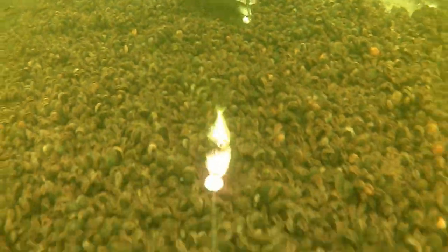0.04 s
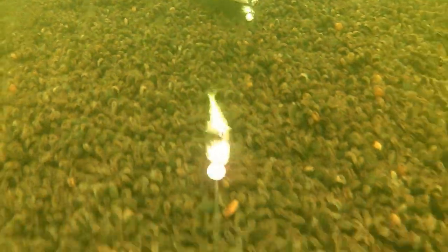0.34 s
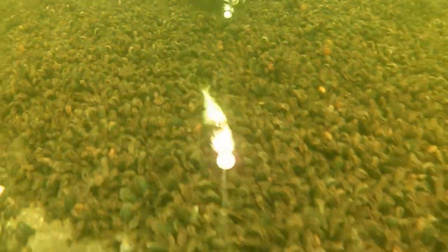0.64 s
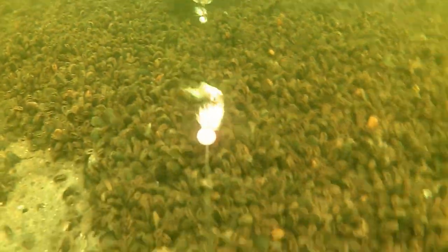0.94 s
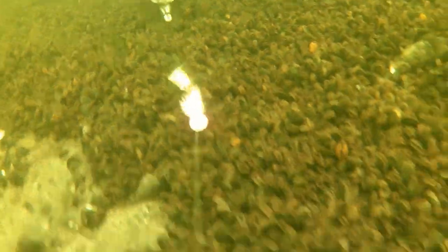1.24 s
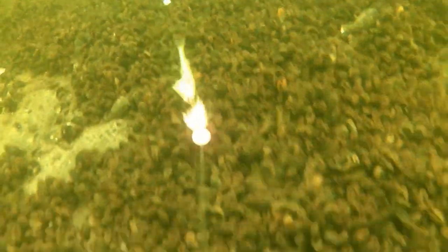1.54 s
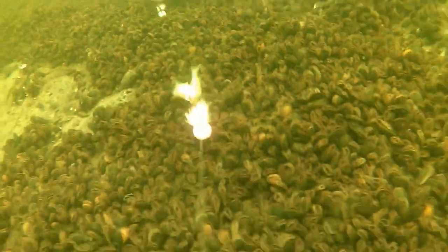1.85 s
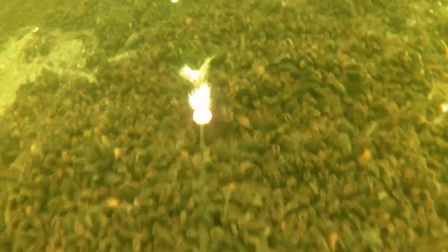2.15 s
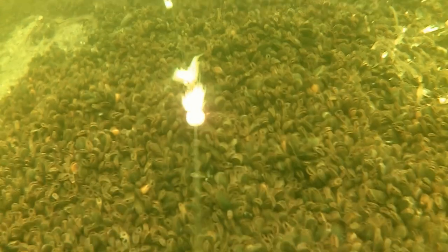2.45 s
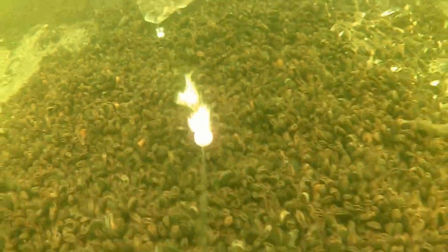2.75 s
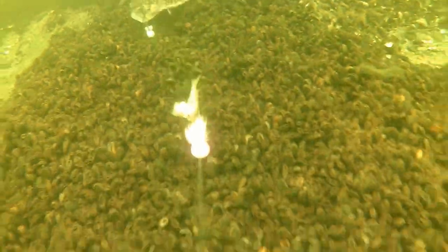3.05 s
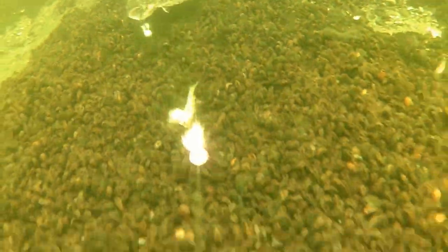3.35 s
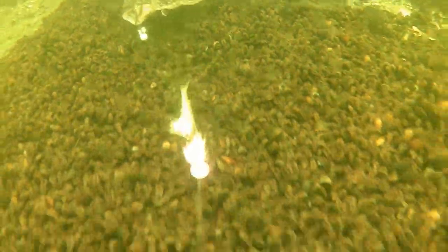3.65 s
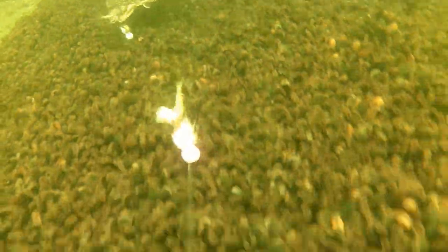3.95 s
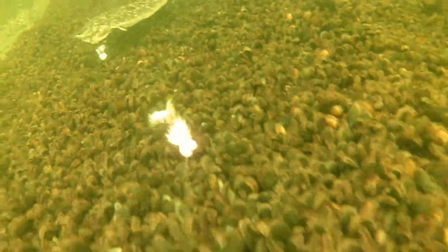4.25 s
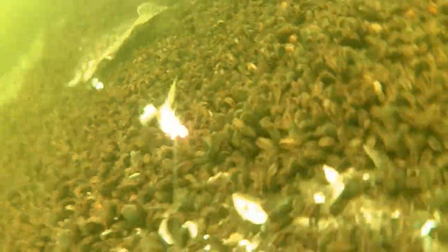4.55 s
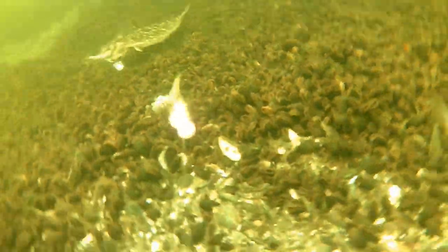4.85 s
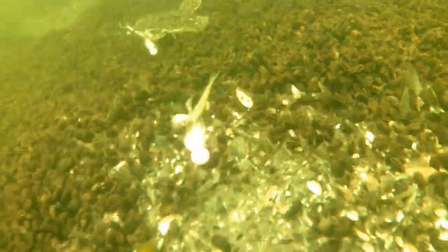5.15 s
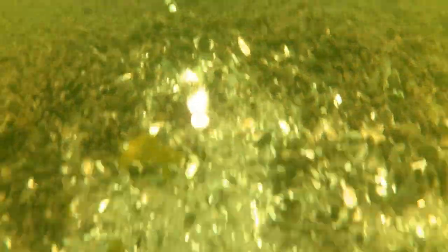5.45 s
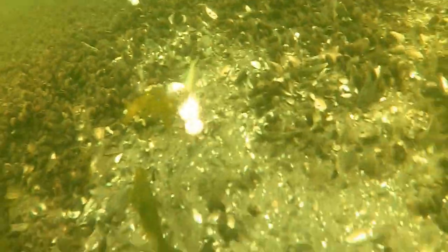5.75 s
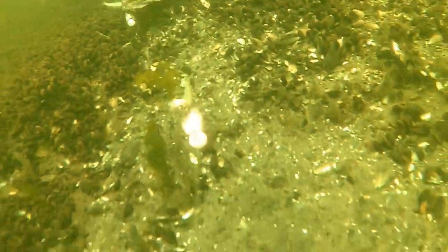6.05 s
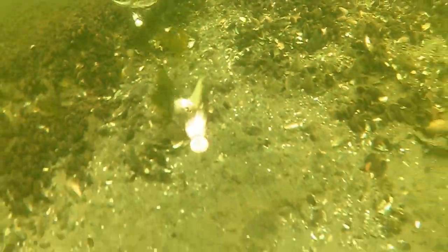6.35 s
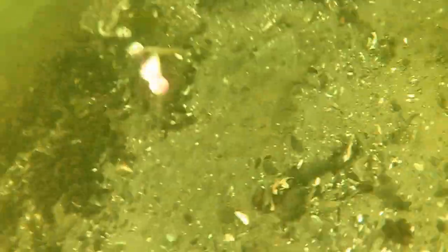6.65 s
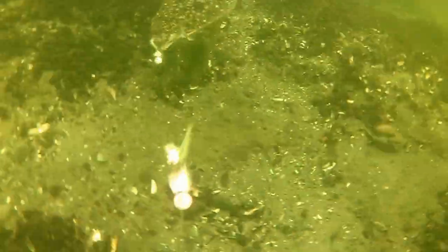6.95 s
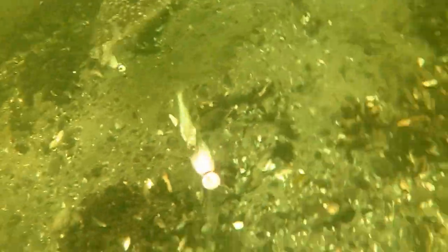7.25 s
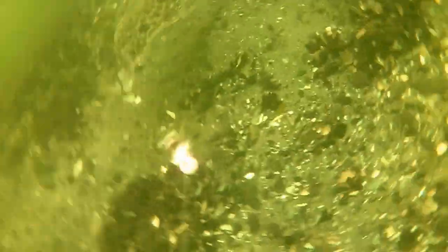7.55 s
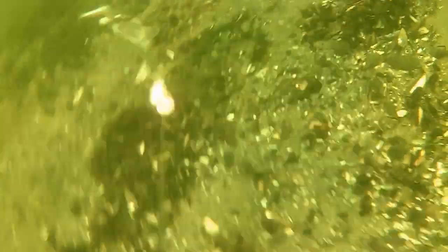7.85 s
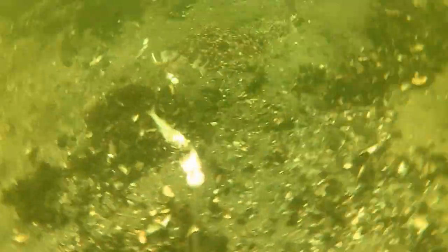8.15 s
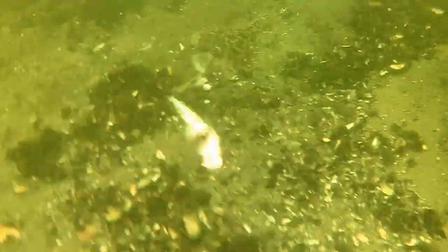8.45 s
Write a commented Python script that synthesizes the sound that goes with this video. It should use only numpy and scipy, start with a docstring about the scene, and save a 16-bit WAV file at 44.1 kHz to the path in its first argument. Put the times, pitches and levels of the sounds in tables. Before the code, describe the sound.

Lead jigs are towed over a shell bed, heard from inside a sealed underwater camera housing. The line rattles faintly at first, then rubs and hums very quietly beneath a soft, even water hiss. A sharp double click and a few scattered light taps come through. In the last couple of seconds the knocks grow louder and crowd together, short and hard, with brief scrapes and dull bumps from the rig.

```python
"""On an underwater shell bed, a camera in a sealed housing is towed with lead jigs trailing on its lines.
Lead knocks and drags on shells, and each contact excites the same short-lived modes of the housing;
once the rig runs on the bed, hard knocks bring a clatter and bumps set its frame ringing low.
Between knocks the tow line rubs by stick-slip friction, rattles on its fitting and hums as it sheds
eddies in the current, over a faint steady hiss."""
import sys
import numpy as np
from scipy import signal
from scipy.fft import rfft, irfft
from scipy.io import wavfile
from scipy.ndimage import uniform_filter1d

SR = 44100
rng = np.random.default_rng(int(sys.argv[2]) if len(sys.argv) > 2 else 0)


def transcribe(signal):
    """Save signal, clipped to [-1, 1], as a 16-bit WAV file at the path in sys.argv[1]."""
    frames = np.atleast_2d(signal).T
    limited = np.clip(frames, -1, 1)
    pcm = np.round(limited * 32767).astype(np.int16)
    wavfile.write(sys.argv[1], SR, pcm)


N = 383229
T = np.arange(N) / SR

# Impacts of lead on shell. Each row: start in seconds, relative level in dB,
# hollowness (lift of the low modes) in dB, brightness (lift of the high modes) in dB.
KNOCKS = [(1.0744, -47, 4, -18), (1.8516, -53, 8, -8.5), (2.014, -26, -8.5, -1), (2.0195, -32.5, 4, 0.5),
          (2.042, -47.5, 11, -6), (2.0635, -30.5, -4, -4), (2.07, -44, 11.5, -12), (2.2838, -47, 6.5, -5.5),
          (2.558, -51, 11.5, -16), (4.3564, -34.5, -1, -8.5), (4.4811, -42, 2, -4.5),
          (4.5154, -39.5, 2.5, -14), (4.732, -49, 3, -2), (5.6075, -45, 6.5, -7), (6.4275, -49.5, 6, -8.5),
          (6.4593, -55, 5, 14), (6.4813, -26.5, 7.5, 5), (6.4939, -32, 1, 2), (6.508, -25, 5, 3.5),
          (6.576, -49, 18, 5), (6.5882, -40, 5, 2), (6.6022, -16.5, -4.5, 2), (6.6216, -41, 7, 1.5),
          (6.8659, -45.5, 7.5, -8), (6.913, -48.5, 6, -26), (7.112, -45, 7, -18), (7.153, -45, 11, 1),
          (7.2023, -44, 4, -1), (7.2164, -25.5, 0, -2.5), (7.234, -40.5, 5, -14.5), (7.3613, -46.5, 9, -6),
          (7.403, -40.5, 4, -0.5), (7.4076, -25, -5.5, -4), (7.4152, -32, 9, 3), (7.428, -35, 5.5, -11),
          (7.4773, -33.5, 2, -1.5), (7.5063, -25.5, 0.5, 2), (7.513, -36, 1, 0), (7.6743, -46, 3.5, -8.5),
          (7.7872, -24, -2.5, -1), (7.8474, -48.5, 13, -4), (7.927, -30, 3, 3), (7.9475, -37, 7.5, -2),
          (8.073, -43, 7.5, -6.5), (8.104, -24, 0, -2.5), (8.1147, -34, 2, -6), (8.1195, -38, 5.5, 0.5),
          (8.3019, -44.5, 5.5, -0.5), (8.333, -18.5, -1, -1.5), (8.337, -33, 9.5, 7.5),
          (8.3456, -35.5, 1.5, -4), (8.3899, -40, 8, 4.5), (8.444, -28, 4.5, 4), (8.453, -35, 8.5, 3.5),
          (8.4729, -17.5, -4, -2), (8.4767, -32, 11.5, 7.5), (8.4906, -37.5, 11.5, 0),
          (8.496, -32.5, 2, -3), (8.5547, -32.5, -4, 3), (8.557, -25, 6, 3.5), (8.5936, -29.5, 2.5, 2.5),
          (8.624, -20, -2.5, 1), (8.6388, -35, 7.5, -11), (8.6675, -37.5, 7, 2.5)]
# Normal modes of the housing. Each row: frequency in Hz, t60 in seconds, relative energy in dB.
HOUSING_MODES = [(886.7, 0.066, -10.5), (1338, 0.0066, -16), (1724, 0.015, -8), (1892, 0.022, -4.5),
                 (1980, 0.0135, -8.5), (2237, 0.023, -12.5), (2918, 0.022, -1.5), (3360, 0.011, 0),
                 (3515, 0.0065, -7), (4013, 0.0072, 2), (4170, 0.026, -10), (4750, 0.024, -13.5),
                 (5475, 0.0072, 5.5), (6195, 0.013, -0.5), (6830, 0.0059, -7), (7890, 0.011, -3),
                 (8780, 0.0072, -9.5), (9490, 0.0041, -4.5), (9800, 0.008, -5.5), (10130, 0.0044, -8.5),
                 (11340, 0.0073, -22), (12100, 0.0051, -29), (13000, .003, -29), (14600, .003, -29)]


def knocks(gain_db=15, scatter_db=4, chip_db=-15, chip_s=0.0026, scrape_db=-25, scrape_s=0.0054,
           scrape_hz=3000, graze=0.76, soften=0.29, size=1400):
    """Impact excitation: a blow, brief chipping and a dull scrape drive the modes of the housing."""
    out, t = np.zeros(N), T[:size]
    hz = np.array(HOUSING_MODES)[:, 0]
    low = hz < 2550
    middle = np.exp(-((hz - 5600) / 1200) ** 2)
    high = np.clip((hz - 6000) / 2600, 0, 2)
    spread = np.where(hz == hz.min(), 0.043, 0.013)
    lowpass = signal.butter(1, scrape_hz, fs=SR)
    hardest_db = np.array(KNOCKS)[:, 1].max()
    for s, db, low_db, high_db in list(KNOCKS) + clatter() + stray_taps():
        # light blows only graze the shell: more scrape, less of the hard middle ring
        lightness = hardest_db - db
        colour, detune = rng.uniform(-1.28, 1, (2, len(hz)))
        extra_db = low * low_db + high * high_db - middle * soften * lightness + scatter_db * colour
        chips = undb(chip_db) * crackle(np.exp(-t / chip_s))
        scrape = undb(scrape_db + graze * lightness) * crackle(np.exp(-t / scrape_s) * t ** .5)
        force = signal.unit_impulse(size) + chips + signal.lfilter(*lowpass, scrape)
        body = ring(HOUSING_MODES, rise_s=0.00062, extra_db=extra_db, detune=spread * detune)
        blow = signal.fftconvolve(force, body)
        blow *= np.linalg.norm(body) / np.linalg.norm(blow)  # roughness alters colour, not energy
        add(out, s, undb(db + gain_db) * blow)
    return out


def clatter(grounded_s=6.4, hard_db=-31.5, brush_s=0.012, brush_db=-56, settle_db=-48,
            fade_db_per_s=196, scatter_db=2, low_db=11, bright_db=-2, count=3):
    """Repeated contact: on the bed, lead brushes before a hard knock and settles after. Rows as KNOCKS."""
    rows = []
    for s, db, *_ in KNOCKS:
        place = rng.random(count + 1)
        uneven_db = scatter_db * rng.standard_normal(count + 1)
        brush = (-brush_s * (1 - place[0] / 2), brush_db)
        lags = .006 + .015 * (np.arange(count) + place[1:])  # one touch in each 15 ms
        settling = zip(lags, settle_db - fade_db_per_s * lags)
        if db > hard_db and s > grounded_s:
            for (lag, level), uneven in zip([brush, *settling], uneven_db):
                rows.append((s + lag, level + uneven, low_db, bright_db))
    return rows


def stray_taps(per_s=3.4, tap_db=-55, scatter_db=1.5, low_db=6, bright_db=-5, count=60):
    """Grazing impact: now and then the lead barely touches a shell. Rows as KNOCKS."""
    times = (np.arange(count) + rng.random(count)) / per_s
    levels = tap_db + scatter_db * np.clip(rng.standard_normal(count), -2, 2)
    return [(s, db, low_db, bright_db) for s, db in zip(times, levels) if s < N / SR]


def rubs(gain_db=29, width_s=0.0088, per_s=15, lesser_db=-2, uneven_db=2, scatter_db=2, spread=0.0083):
    """Stick-slip friction: the line slips in soft, uneven strokes, each ringing a little differently."""
    # The firmest slips on the fitting. Each row: time in seconds, relative level in dB.
    firm_slips = [(0.494, -66), (2.851, -66), (3.361, -61), (3.939, -62.5), (4.254, -63.5), (4.685, -64.5),
                  (5.276, -62), (5.331, -67), (5.439, -67), (6.098, -67.5)]
    # Contour of the lesser slips. Each row: time in seconds, relative level in dB.
    lesser_contour = [(0, -65), (1.3, -72.5), (2.5, -69), (3.4, -67), (5.8, -67), (6.8, -69.5), (8.69, -71)]
    # Modes the rubbing excites. Each row: frequency in Hz, t60 in seconds, relative energy in dB.
    rubbed_modes = [(2890, 0.0095, -7), (3240, 0.01, -17), (3960, 0.014, 4), (4516, 0.0088, -6.5),
                    (4860, 0.0076, -10), (5350, 0.016, -8.5), (6870, 0.0075, -16.5), (7740, 0.0073, -9),
                    (9900, 0.0027, -13)]
    out = np.zeros(N)
    slots = np.arange(0, N / SR, 1 / per_s)
    times = slots + rng.random(len(slots)) / per_s
    levels = np.interp(times, *np.transpose(lesser_contour)) + lesser_db
    levels += uneven_db * rng.standard_normal(len(slots))
    stroke = np.exp(-.5 * (T[:SR // 16] / width_s - 3) ** 2)  # peaks three widths in
    for s, db in list(firm_slips) + list(zip(times, levels)):
        colour, detune = rng.standard_normal((2, len(rubbed_modes)))
        body = ring(rubbed_modes, rise_s=0.00053, extra_db=scatter_db * colour, detune=spread * detune)
        add(out, s - 3 * width_s, undb(db + gain_db) * signal.fftconvolve(crackle(stroke), body))
    return out


def drags(tilt_db_per_octave=-2):
    """Sliding friction: tiny slips of lead across shells sound through the housing as a crunch."""
    # Each row: start in seconds, length in seconds, level in dB.
    slides = [(6.443, 0.024, -53.5), (6.51, 0.037, -62), (6.568, 0.082, -55), (7.085, 0.03, -63),
              (7.897, 0.018, -57), (8.377, 0.052, -51)]
    out = np.zeros(N)
    octaves = np.log2(np.array(HOUSING_MODES)[:, 0] / 1000)
    body = ring(HOUSING_MODES, rise_s=0.000422, extra_db=tilt_db_per_octave * octaves)
    for s, length_s, db in slides:
        stroke = np.hanning(int(length_s * SR))
        crunch = signal.fftconvolve(crackle(stroke), body / np.linalg.norm(body))
        add(out, s, undb(db) * np.sqrt(len(stroke)) * crunch)
    return out


def bumps(sway_hz=37, sway_peak_s=0.025, frame_peak_s=0.026):
    """Damped vibration: a bump on the bed makes the whole rig sway and its frame ring low."""
    # Each row: start in seconds, sway level in dB, frame frequency in Hz, frame level in dB.
    bed_contacts = [(6.452, -43, 147.6, -49), (7.158, -62, 170, -59), (7.25, -64, 171, -54),
                    (7.476, -53, 167, -57), (7.895, -46.5, 166, -58.5), (8.06, -57, 169, -56),
                    (8.395, -50, 154.6, -53), (8.536, -60, 164, -58)]
    out, t = np.zeros(N), T[:SR // 3]

    def swell(hz, peak_s):
        return t / peak_s * np.exp(1 - t / peak_s) * np.sin(2 * np.pi * hz * t)

    for s, sway_db, frame_hz, frame_db in bed_contacts:
        add(out, s, undb(sway_db) * swell(sway_hz, sway_peak_s))
        add(out, s, undb(frame_db) * swell(frame_hz, frame_peak_s))
    return out


def rattle(strum_hz=55.2, jitter=0.0398, scatter_db=1.4):
    """Periodic impact: the slack, strumming line taps its fitting once a cycle."""
    # Strength of the rattle. Each row: time in seconds, level in dB.
    contour = [(.15, -73), (.3, -61), (.41, -58.5), (.465, -65), (.505, -56), (.57, -52.5), (.66, -58.5),
               (.76, -57.5), (.98, -67)]
    # Modes of the fitting. Each row: frequency in Hz, t60 in seconds, relative energy in dB.
    fitting_modes = [(891.4, 0.045, -0.5), (1000, 0.011, -5), (1790, 0.036, 2.5), (1937, 0.032, -2)]
    s, db = np.transpose(contour)
    cycles = np.cumsum(strum_hz * (1 + jitter * walk(50))) / SR
    taps = np.diff(np.floor(cycles), prepend=0) * undb(scatter_db * walk(60.2))
    ringing = unit(signal.fftconvolve(taps, ring(fitting_modes, rise_s=0.00033))[:N])
    return ringing * undb(np.interp(T, s, db)) * (T < s[-1])


def aeolian_tones(hum_hz=61, hum_db=-1, whistle_hz=1478, whistle_db=-2, tilt_db_per_octave=-6):
    """Vortex shedding: eddies make the taut line hum and the thin leader whistle."""
    # Strength of each tone. Each row: time in seconds, relative level in dB.
    hum_contour = [(0, -70), (1.5, -82), (3.4, -70), (4.1, -76), (4.9, -63.5), (7.1, -64), (7.5, -70),
                   (8.69, -66)]
    whistle_contour = [(0, -77), (.9, -68), (1.55, -76.5), (1.9, -66), (2.45, -72.5), (3.0, -68),
                       (3.5, -74), (4.0, -63.5), (4.5, -71.5), (4.9, -64.5), (5.3, -75), (6.4, -75.5),
                       (7.0, -64.5), (7.6, -75.5), (8.69, -71)]
    hum_phase = 2 * np.pi * np.cumsum(hum_hz * (1 + 0.015 * walk(4.6))) / SR
    hum = sum(undb(tilt_db_per_octave * np.log2(k)) * np.sin(k * hum_phase) for k in range(1, 6))
    hum = unit(hum) * undb(np.interp(T, *np.transpose(hum_contour)) + hum_db)
    whistle_phase = 2 * np.pi * np.cumsum(whistle_hz * (1 + 0.004 * walk(60))) / SR
    whistle = np.sin(whistle_phase) * undb(1.25 * walk(25))
    whistle = unit(whistle) * undb(np.interp(T, *np.transpose(whistle_contour)) + whistle_db)
    return hum + whistle


def water(hiss_db=-60, flow_db=-65, flicker_db=1.56):
    """Broadband excitation: passing water rings the housing, over a steady hiss."""
    # Modes the flow excites. Each row: frequency in Hz, t60 in seconds, relative energy in dB.
    flow_modes = [(2023, 0.014, 2.5), (2234, 0.00753, 4.5), (2910, 0.006, -2), (3322, 0.0076, 1.5),
                  (4054, 0.0056, 0.5), (5100, 0.0047, -11), (5930, 0.0065, -12.5), (6140, 0.0073, -13),
                  (7265, 0.0085, -10.5), (7740, 0.0044, -12.5), (8770, 0.0041, -26), (10160, 0.0021, -6)]
    # Spectrum of the hiss. Each row: frequency in Hz, relative spectral density in dB.
    hiss_spectrum = [(15, -2), (35, 1.5), (110, 0.5), (250, -5), (500, -10), (1000, -14.5), (1600, -14),
                     (2600, -29), (3600, -30.5), (4600, -22), (6500, -27), (9000, -29.5), (12500, -31),
                     (15800, -34)]
    flow = unit(signal.fftconvolve(rng.standard_normal(N), ring(flow_modes, rise_s=0.0014))[:N])
    return undb(hiss_db) * noise(hiss_spectrum) + flow * undb(flow_db + flicker_db * walk(21))


def ring(modes, rise_s, extra_db=0, detune=0, size=1200):
    """Modal superposition: damped sines swell briefly, with neighbours in opposite phase."""
    hz, t60, db = np.transpose(modes)
    t = T[:size]
    waves = np.sin(2 * np.pi * np.outer(hz * (1 + detune), t))
    waves *= undb(-60 * t / t60[:, None]) * (1 - np.exp(-t / rise_s))
    waves /= np.linalg.norm(waves, axis=1)[:, None]
    polarity = (-1) ** np.arange(len(hz))
    return (undb(db + extra_db) * polarity) @ waves


def crackle(envelope):
    """Surface roughness: dense, uneven micro-contacts under an envelope, with energy 1."""
    x = rng.standard_normal(len(envelope)) * rng.exponential(size=len(envelope)) * envelope
    return x / np.linalg.norm(x)


def noise(points):
    """Spectral shaping: noise of rms 1 that follows (Hz, dB) points."""
    hz, db = np.transpose(points)
    bins = np.arange(N // 2 + 1) * SR / N
    gain = undb(np.interp(np.log(bins + 1), np.log(hz), db))
    return unit(irfft(rfft(rng.standard_normal(N)) * gain, N))


def walk(per_s):
    """Random fluctuation of rms 1, gliding to a new value per_s times a second."""
    hold = int(SR / per_s)
    steps = np.repeat(rng.standard_normal(N // hold + 1), hold)
    return unit(uniform_filter1d(steps, hold)[:N])


def undb(db):
    """Decibels to amplitude ratio."""
    return 10 ** (np.asarray(db) / 20)


def unit(x):
    """Normalisation to rms 1."""
    return x / np.sqrt(np.mean(x ** 2))


def add(out, s, x):
    """Superpose x on out, starting at s seconds."""
    i = max(int(s * SR), 0)
    out[i:i + len(x)] += x[:max(N - i, 0)]


def scene():
    """Superposition: all sources sum at the one microphone inside the housing."""
    return (water() + aeolian_tones() + rattle() + bumps() + drags() + rubs() + knocks())[None]


def record(dry):
    """Band limiting: the camera cuts the treble above 16 kHz."""
    return signal.sosfilt(signal.ellip(8, .2, 70, 16000, fs=SR, output="sos"), dry)


dry = scene()
out = record(dry)
transcribe(out)
```